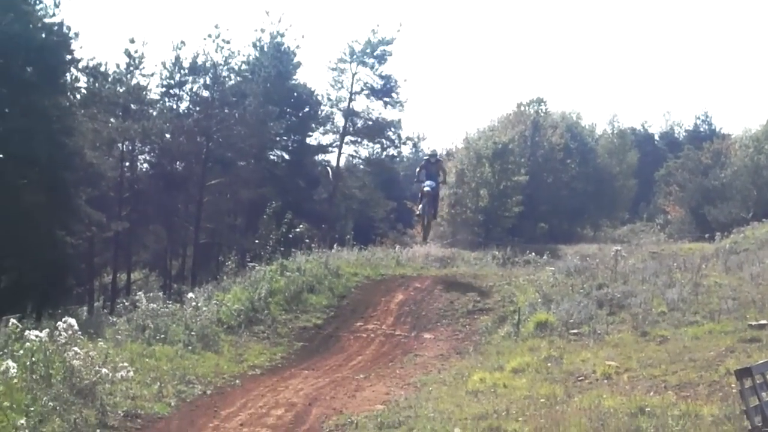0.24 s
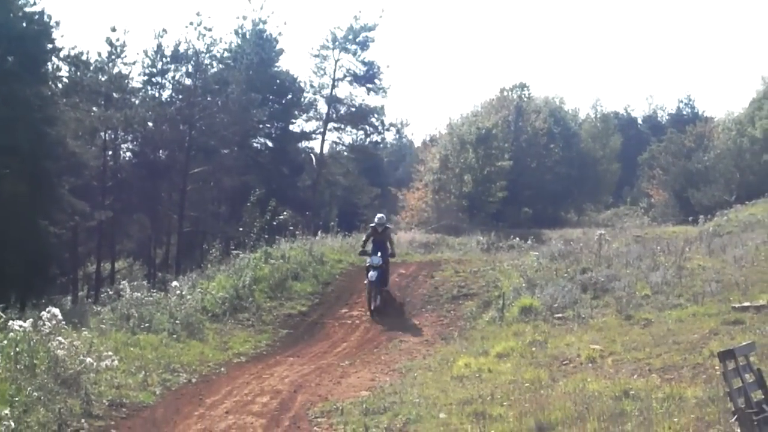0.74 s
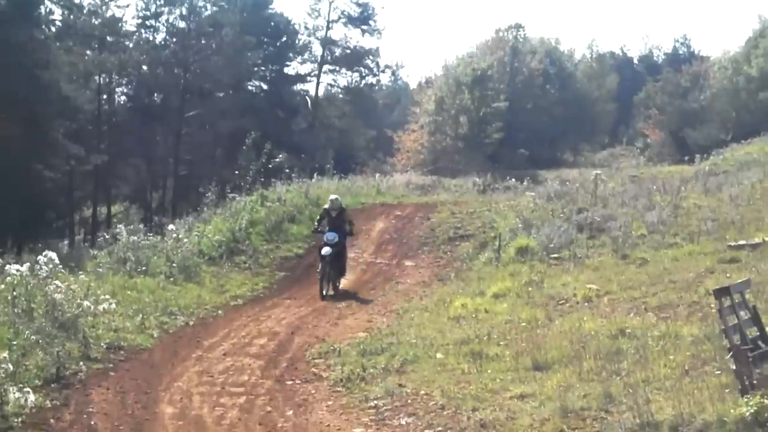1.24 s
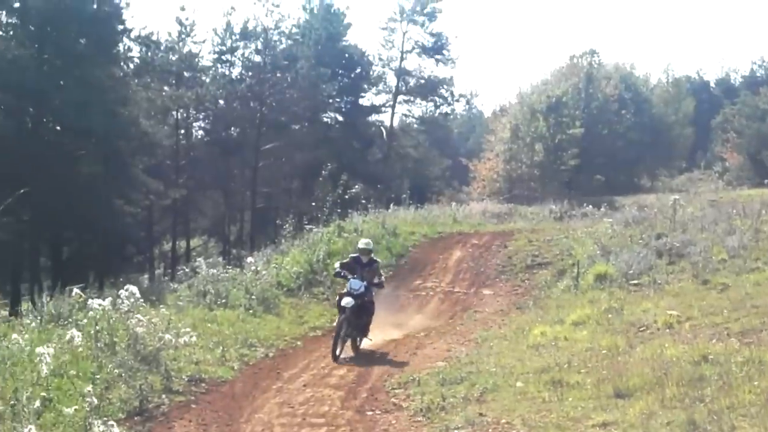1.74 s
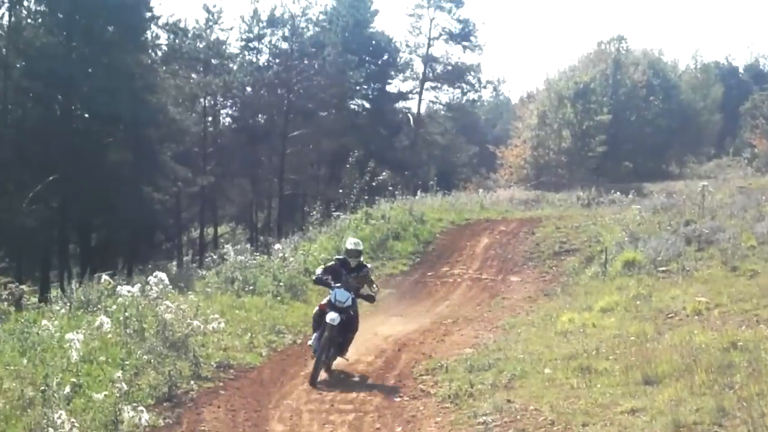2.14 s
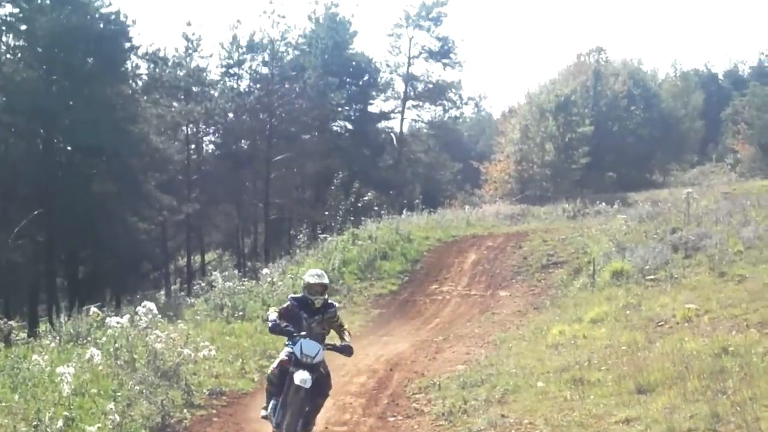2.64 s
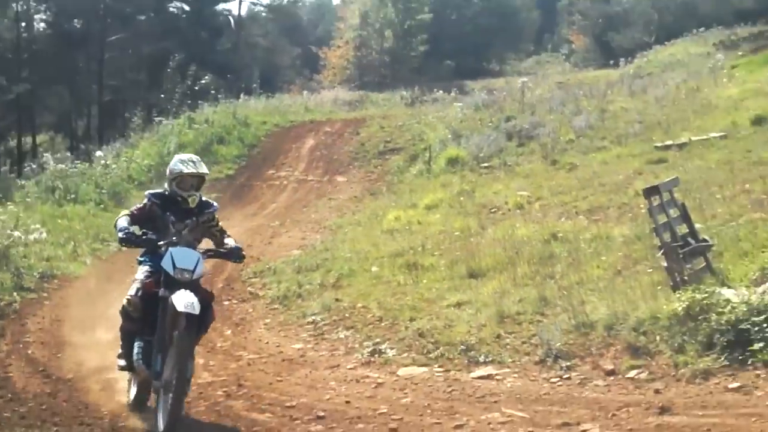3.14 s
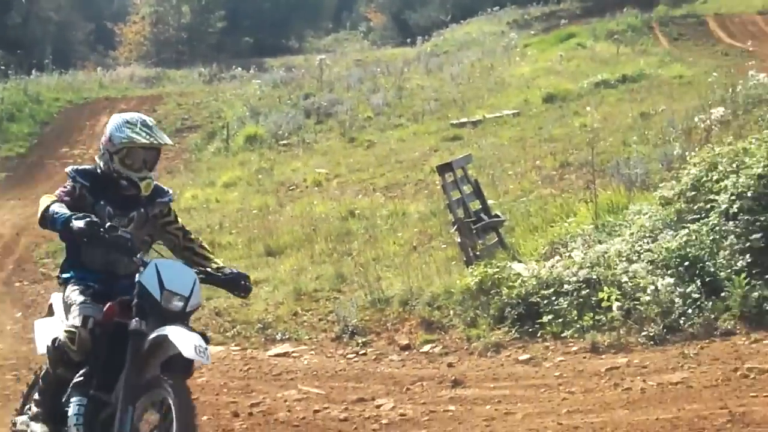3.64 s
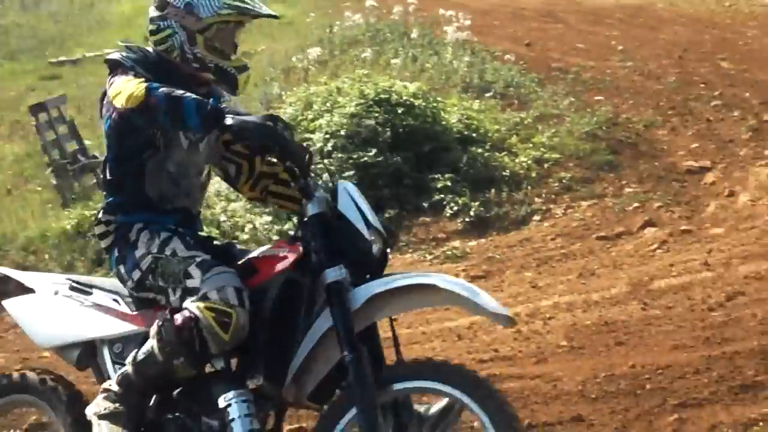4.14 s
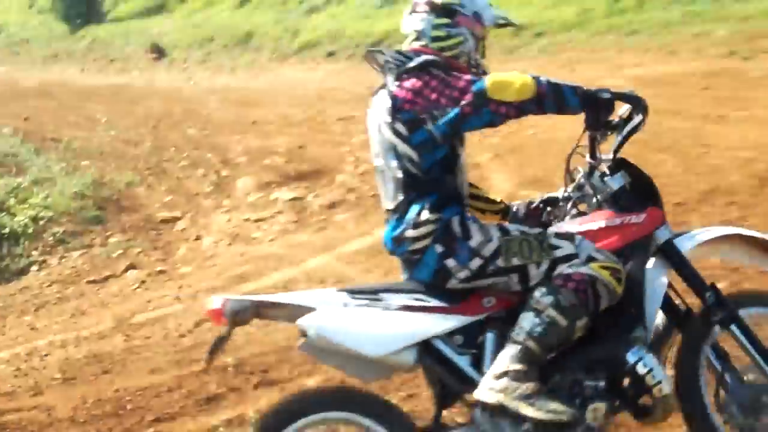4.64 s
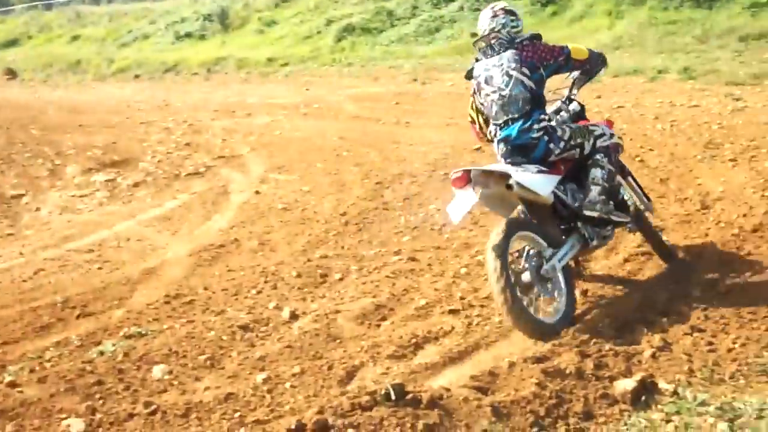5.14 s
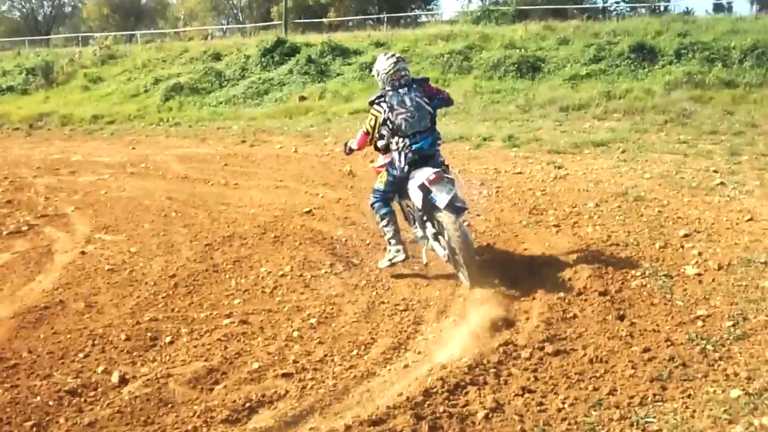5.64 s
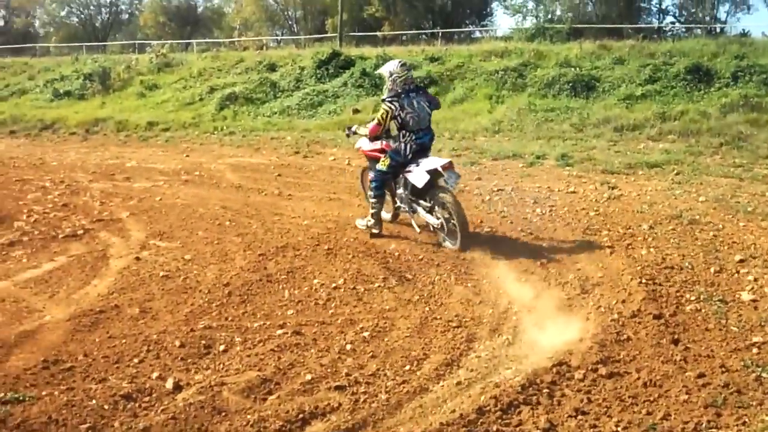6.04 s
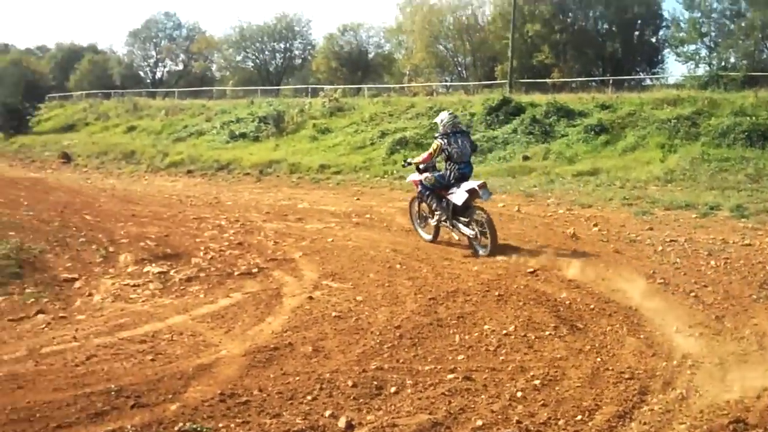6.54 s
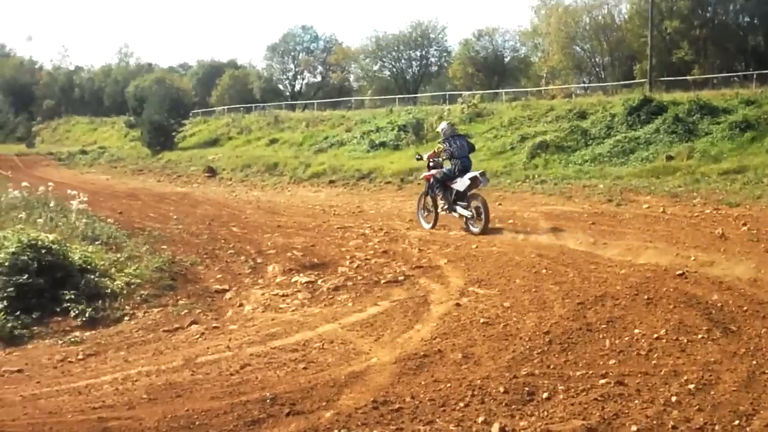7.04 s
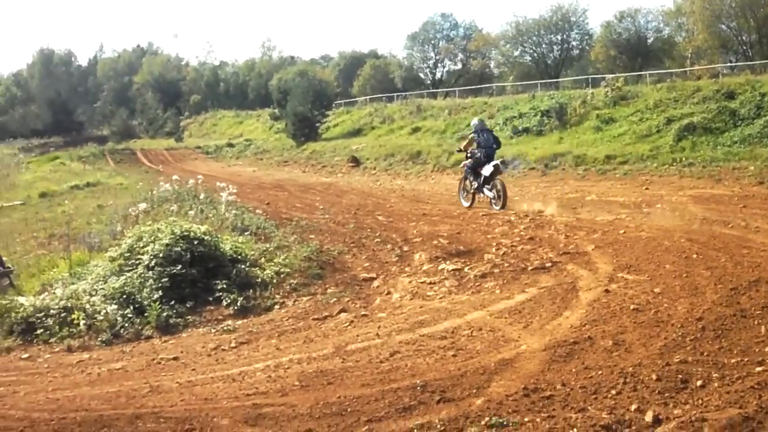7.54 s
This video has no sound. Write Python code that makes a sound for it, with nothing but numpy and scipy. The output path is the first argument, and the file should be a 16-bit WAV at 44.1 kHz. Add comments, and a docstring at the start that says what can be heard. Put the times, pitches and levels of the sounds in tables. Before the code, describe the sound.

On an open dirt track beside trees, a two-stroke dirt bike hums lightly in the air, lands with chain jingle and pops, and gives a sharp throttle burst. A second, slower engine thumps out of sight. The bike coasts nearer with gear whine and clatter, becoming rough and knocking alongside. Sound vanishes for over half a second, then crackles back as it accelerates away, barking, and shifts gear. Light wind rumbles on the handheld microphone.

```python
"""Dirt bike at the bend

In the open before a tree line, a two-stroke lands a jump, gives a burst of throttle, coasts up to about
4 m from the microphone and powers away out of a bend; firings and gas puffs ring its exhaust resonances.
A second, slower-thumping bike, strongest early on, runs out of sight as timed pulses, drone and ticks.
Filtered noise makes light wind on the microphone and distant air. The sound drops out for over half
a second as the bike passes and comes back with a crackle of short noise bursts."""
import sys
import numpy as np
from scipy import signal
from scipy.fft import rfft, irfft
from scipy.io import wavfile
from scipy.ndimage import uniform_filter1d

SR = 44100
rng = np.random.default_rng(int(sys.argv[2]) if len(sys.argv) > 2 else 0)


def store_pcm(level_fs):
    """Save levels as 16-bit WAV."""
    pcm = np.round(np.clip(level_fs, -1, 1) * 32767).astype(np.int16)
    wavfile.write(sys.argv[1], SR, np.atleast_2d(pcm).T)


N = 343978
TIME = np.arange(N) / SR
# each goes from 0 to 1: bike back on the ground, bike past the microphone, next gear in
LANDED = np.clip((TIME - .7) / .4, 0, 1)
PASSED = np.clip((TIME - 4.6) / .5, 0, 1)
SHIFTED = np.clip((TIME - 7.1) / .2, 0, 1)


def from_db(db):
    """Decibels to gain."""
    return 10 ** (np.asarray(db) / 20)


def in_time(rows):
    """Each column of a curve, at every sample."""
    s, *columns = np.transpose(rows)
    return [np.interp(TIME, s, c) for c in columns]


def steady(x, size=1800):
    """Hold the running power at one; single firings keep their shape."""
    power = uniform_filter1d(uniform_filter1d(x ** 2, size), size)
    return x / np.sqrt(np.abs(power) + 1e-14)


def below(x, hz, order=4):
    """The part of a sound under a frequency, without delay."""
    return signal.sosfiltfilt(signal.butter(order, hz, fs=SR, output="sos"), x)


def colour(x, spectrum):
    """Causal, minimum-phase filter with a (Hz, dB) curve; white noise keeps its power."""
    hz, db = np.transpose(spectrum)
    size = 2 ** 13
    bins = np.maximum(np.arange(size // 2 + 1) * SR / size, 1)
    gain = from_db(np.interp(np.log(bins), np.log(hz), db))
    # folding the cepstrum to positive times gives the minimum phase
    cepstrum = irfft(np.log(gain))
    response = irfft(np.exp(rfft(2 * cepstrum[:size // 2], size) - cepstrum[0]))
    return signal.oaconvolve(x, response / np.sqrt(np.sum(response ** 2)))[:N]


def resonate(x, modes):
    """Parallel two-stage resonances with steep skirts, from (Hz, width Hz, dB) rows."""
    out, x = 0, x + 1e-12 * rng.standard_normal(N)
    for hz, width, db in modes:
        r = np.exp(-np.pi * width / SR)
        stage = [(1 - r * r) / 2, 0, (r * r - 1) / 2, 1, -2 * r * np.cos(2 * np.pi * hz / SR), r * r]
        out = out + from_db(db) * signal.sosfilt([stage, stage], x)
    return out


def firings(turns, uneven_db):
    """One click per cycle, each of its own strength, placed between samples."""
    at = np.flatnonzero(np.diff(np.floor(turns)) > 0)
    late = (np.ceil(turns[at]) - turns[at]) / (turns[at + 1] - turns[at])
    strength = from_db((uneven_db * rng.standard_normal(N))[at])
    clicks = np.zeros(N)
    clicks[at], clicks[at + 1] = strength * (1 - late), strength * late
    return steady(clicks, size=4000)


def puffs(turns, length):
    """Turbulence that bursts at each firing and dies within a share of the cycle."""
    return steady(rng.standard_normal(N) * np.exp(-(turns % 1) / length))


def bursts(events, decay_s):
    """A short dying burst of noise for each (s, dB) row."""
    envelope = sum(from_db(db) * (TIME >= s) * np.exp(-np.abs(TIME - s) / decay_s) for s, db in events)
    return envelope * rng.standard_normal(N)


def per_turn(turns):
    """A random value for each turn, gliding from one to the next."""
    return np.interp(turns, np.arange(N), rng.standard_normal(N))


def radiate(x, table, pace=1):
    """Colour a sound as heard from ahead, then from behind; a pace under one lowers every resonance."""
    samples, clock = np.arange(N), np.cumsum(pace * np.ones(N)) - 1
    slowed = np.interp(samples, clock, x, right=0)
    ahead, behind = (np.interp(clock, samples, colour(slowed, np.array(table)[:, [0, side]]))
                     for side in (1, 2))
    return ahead + (behind - ahead) * PASSED


# faint air over the open ground: pitch_hz, relative_db (per Hz)
AIR_COLOUR = [(40, -22.5), (200, -4.5), (700, -11.5), (2000, -25.5), (4000, -27.5), (5500, -72),
              (8500, -45), (15500, -47.5)]


def distant_air():
    """Steady coloured noise stands for the distant air."""
    return from_db(-51.0) * colour(rng.standard_normal(N), AIR_COLOUR)


# gusts at the microphone: start_s, level_db
WIND_LEVEL = [(0, -49), (.9, -41), (1.7, -46), (3.3, -40), (5.3, -44), (5.9, -40), (6.2, -56), (7.8, -42)]
# their low rumble: pitch_hz, relative_db (per Hz)
WIND_COLOUR = [(15, -13), (30, -1), (55, -1), (110, -2), (200, -3), (400, -26.5), (1000, -54.5)]


def wind():
    """Wind pushes on the microphone as low noise that swells and falls."""
    level_db, = in_time(WIND_LEVEL)
    return from_db(level_db) * colour(rng.standard_normal(N), WIND_COLOUR)


def woods(x):
    """The tree line scatters back a faint, dull tail."""
    t = TIME[:SR]
    scatter = rng.standard_normal(SR) * from_db(-60 * t / .9) * (t > .025)   # falls 60 dB in 0.9 s
    scatter = scatter / np.sqrt(np.sum(scatter ** 2))
    scatter = signal.sosfilt(signal.butter(1, 2500, fs=SR, output="sos"), scatter)
    return from_db(-26) * signal.fftconvolve(x, scatter)[:N]


# the bike out of sight: start_s, rate_hz (firings per s)
OTHER_RATE = [(0, 42.6), (.2, 42.9), (.3, 43), (.37, 44.3), (.46, 43.4), (.55, 45.5), (.62, 49.5),
              (.68, 48.6), (.8, 52.5), (.95, 56.7), (1.0, 57), (1.05, 49), (1.09, 55.6), (1.16, 53),
              (1.22, 45.7), (1.45, 74), (1.62, 53), (1.84, 65), (1.93, 52.3), (2.0, 71.5), (2.08, 77),
              (2.17, 60), (2.26, 80), (2.52, 73.3), (3.2, 70.2), (5.9, 69), (6.8, 83)]
# how loud it comes over, before the shares of drone, thump and tick: start_s, level_db
OTHER_LEVEL = [(0, -46), (.56, -45.5), (.58, -41), (1.0, -36.5), (1.16, -34), (1.24, -48), (1.6, -43),
               (1.82, -33.5), (1.93, -36.5), (2.06, -31.5), (2.18, -42), (2.7, -44), (3.1, -50), (3.6, -54),
               (5.3, -41), (5.7, -42), (6.4, -50.5), (6.9, -44.5), (7.25, -56)]
# first order against its second in the drone: start_s, share (ratio)
OTHER_FIRST_ORDER = [(1.1, .45), (1.45, 1.2), (1.9, 0.81), (2.3, 0.079), (3.6, .08), (5.6, 1.8), (6.4, .9),
                     (6.8, 0.38)]
# its silencer: pitch_hz, relative_db
OTHER_SILENCER = [(25, -22.5), (43, 3), (86, 2), (130, -9.5), (175, 6), (215, 2.5), (257, 1.5),
                  (330, -10.5), (410, -5), (490, -18), (640, -11.5), (900, -44.5), (5000, -79)]
OTHER_PICKS_UP_S = .5795   # its first hard firing
DRONE_DB_PER_OCTAVE, THUMP_DB_PER_OCTAVE = 15, -12.5   # of revs above 55 firings per s
TICK_DB, IDLE_TICK_DB = -12, -7   # the second is added until it picks up


def other_bike():
    """A slow four-stroke thumps and ticks; at higher revs its thumps merge into a low drone."""
    rate, = in_time(OTHER_RATE)
    level_db, = in_time(OTHER_LEVEL)
    first_order, = in_time(OTHER_FIRST_ORDER)
    octaves = np.log2(rate / 55)
    turns = np.cumsum(rate) / SR
    turns = turns - np.interp(OTHER_PICKS_UP_S, TIME, turns)
    drone = steady(np.sin(4 * np.pi * turns) + first_order * np.sin(2 * np.pi * turns))
    pulses = firings(turns, uneven_db=.6) + .08 * puffs(turns, length=0.9)
    thump = steady(colour(pulses, OTHER_SILENCER))
    valves = puffs(turns, length=.12)
    tick = colour(valves, [(300, -8.0), (1000, 4.5), (2000, 7.0), (3200, 0.0),
                           (4200, -10.0), (5600, -10.5), (9000, -61.0)])
    drone = from_db(DRONE_DB_PER_OCTAVE * octaves) * drone
    thump = from_db(THUMP_DB_PER_OCTAVE * octaves) * thump
    tick = from_db(TICK_DB + IDLE_TICK_DB * (TIME < OTHER_PICKS_UP_S)) * tick
    return from_db(level_db) * (drone + thump + tick)


# a short low tone: start_s, pitch_hz, level_db
HUM = [(7.18, 300.4, -78), (7.24, 281, -54), (7.3, 252, -26), (7.39, 234.5, -26), (7.44, 236.6, -44),
       (7.5, 224.9, -85)]


def falling_hum():
    """A lone low tone, a gliding sine, sinks as the throttle reopens."""
    hz, db = in_time(HUM)
    return from_db(db) * np.sin(2 * np.pi * np.cumsum(hz) / SR)


# stones and chassis knocks: start_s, level_db (of the striking noise)
KNOCKS = [(2.936, -34), (3.8272, -28.5), (3.8897, -29)]
# what they ring: pitch_hz, width_hz, relative_db
KNOCK_MODES = [(1080, 560, 0), (2319, 874, -4.5), (3500, 720, -6), (5200, 1320, -11.5)]


def knocks():
    """Stones and chassis knocks: very short noise bursts ring a few broad resonances."""
    return from_db(12.5) * resonate(bursts(KNOCKS, decay_s=0.005), KNOCK_MODES)


# chain slaps after the landing and as the drive takes up: start_s, level_db (of the striking noise)
CHAIN_SLAPS = [(.99, -39), (1.005, -40.5), (1.058, -33), (1.079, -31.5), (1.096, -36), (1.125, -47),
               (1.245, -30)]
# its jingle: pitch_hz, width_hz, relative_db
CHAIN_RING = [(5650, 1600, -3.5)]


def chain():
    """Each slap of the slack chain sets off a short, bright jingle."""
    return resonate(bursts(CHAIN_SLAPS, decay_s=0.02), CHAIN_RING)


# pitch of the pipe as its gas heats and cools: start_s, pitch_share (of the hot pitch)
PIPE_TUNING = [(1.08, 0.81), (1.28, 0.89), (1.6, 1.03), (1.85, 1), (2.5, 0.89), (5.15, 1), (5.45, 0.94),
               (5.75, 1.003), (5.92, 0.98), (6.25, 1), (6.65, 1.014), (7.05, 0.95), (7.3, 0.87),
               (7.55, 0.87), (7.8, 0.92)]
# boom, bark and rasp with notches between, hot: pitch_hz, ahead_db, behind_db (both relative)
EXHAUST = [(59.19, -26, -9), (138, -1.5, -2), (186.8, 6, 5.5), (371, -1, -6), (420.9, -15.5, -17),
           (458, -5.5, -3.5), (542.7, -4, 13.5), (578, -2.5, 7.5), (760, 4, 18), (948.8, -26.5, -12),
           (1090.2, -4, 6.5), (1213.3, -17.5, -6), (1361.4, -45, -21), (1525, -40.5, -14),
           (1700, -39, -15.5), (1956, -35, -22.5), (2205, -49, -48), (3440, -56, -66)]


def exhaust(x):
    """The pipe rings lower while its gas is cool and rises as it heats under load."""
    pace, = in_time(PIPE_TUNING)
    return radiate(below(x, hz=4000, order=2), EXHAUST, pace)


# single hard firings as the engine catches: start_s, level_db (of the charge, before the pipe)
POPS = [(.992, -33), (1.008, -32), (1.062, -37), (1.083, -28.5), (1.093, -33), (1.25, -32), (1.278, -24),
        (7.322, -30), (7.336, -25.5), (7.369, -25), (7.382, -40), (7.403, -30)]
# the crack of gas: pitch_hz, width_hz, relative_db
POP_CRACK = [(1111.6, 250, -3), (1749, 850, 1)]


def pops():
    """Lone charges go off in the pipe as the engine catches; past the microphone each adds a crack of gas."""
    clicks = np.zeros(N)
    for s, db in POPS:
        clicks[round(s * SR)] = from_db(db)
    charge = clicks + .18 * bursts(POPS, decay_s=.004)
    pipe = exhaust(charge)
    crack = .5 * PASSED * resonate(charge, POP_CRACK)
    return from_db(20) * (pipe - .8 * below(pipe, hz=220, order=2) + crack)


# twists of the grip: start_s (opens), end_s (begins to shut), opening (0-1)
THROTTLE = [(1.05, 1.068, 0.47), (1.237, 1.28, 0.59), (1.267, 1.83, 0.71), (3.0, 3.508, 0.09),
            (4.181, 4.38, 0), (4.998, 5.45, 0.52), (5.37, 5.45, 0.63), (5.407, 5.5, 0.79),
            (5.44, 6.62, 0.84), (6.583, 7.051, 0.9), (7.3, 7.684, 0.8), (7.405, 7.483, 0.81),
            (7.55, 7.583, 0.7), (7.65, 7.802, 0.85)]
# missed firings as the engine picks up: middle_s, length_s
MISFIRES = [(7.353, 0.018), (7.4, 0.0042)]
OPEN_S, CLOSE_S = 0.024, 0.047   # time the engine takes to answer the grip


def throttle():
    """Load on the engine: each twist ramps up, holds and falls away; missed firings cut it."""
    twists = []
    for opens, shuts, opening in THROTTLE:
        ramp = np.minimum((TIME - opens) / OPEN_S, 1 - (TIME - shuts) / CLOSE_S)
        twists.append(opening * np.clip(ramp, 0, 1))
    missed = sum(np.exp(-(2 * (TIME - s) / length) ** 2) for s, length in MISFIRES)
    return np.max(twists, axis=0) * np.clip(1 - missed, 0, 1)


# rider to microphone: start_s, distance_m
DISTANCE = [(0, 24), (1.5, 12.9), (2.5, 11.2), (3.75, 7.5), (4.4, 4.06), (5.15, 6.43), (6.0, 7.53),
            (7.8, 11.56)]
# how squarely the silencer points at the microphone in the bend: start_s, aim (0-1)
AIM = [(5.15, 0), (5.5, 1), (5.95, 0.72), (6.25, 0.34), (7.8, 0.17)]
# loudness law of each part of the engine's voice, one row each, before that part's own mix:
# gain_db (10 m, 90 firings per s, throttle shut), throttle_db (added at full), revs_db (per octave),
# distance_db (per doubling), behind_db, aimed_db (in line with the silencer), next_gear_db
BOOM_LAW = (-35.5, 20, 3.5, -3.5, 1.5, -4, -2)
BARK_LAW = (-51, 29.5, -1, -7.5, -11, 12, 3)
HONK_LAW = (-71, 23.5, -36, -3, 0.5, -3.5, -5)
RASP_LAW = (-59, 23, -2.5, -1, 3, 2, 0)
METAL_LAW = (-44.5, 9.5, 6.5, -9.5, 4, -9, 0.5)
GEARS_LAW = (-51.5, 0, 0, -3.5, 0, 0, 0)


def loudness(law, opening, rate):
    """Gain of one part of the engine's voice from throttle, revs, distance and heading."""
    base_db, throttle_db, revs_db, distance_db, behind_db, aimed_db, shifted_db = law
    octaves = np.log2(rate / 90)
    doublings = np.log2(in_time(DISTANCE)[0] / 10)
    heading_db = PASSED * (behind_db + aimed_db * in_time(AIM)[0]) + SHIFTED * shifted_db
    running_db = throttle_db * opening + revs_db * octaves
    return from_db(base_db + running_db + distance_db * doublings + heading_db)


def meshing(turns, count=40):
    """Teeth meet alike on every turn: all orders of the revs, spread evenly over the turn."""
    share = np.linspace(0, 1, 2048)
    one_turn = sum(np.cos(2 * np.pi * (order * share + rng.random())) for order in range(1, count))
    return np.interp(turns % 1, share, one_turn)


# gears and intake singing on a shut throttle: pitch_hz, width_hz, relative_db
GEARBOX = [(424, 70, 12), (543, 50, 13.5), (787, 140, 7), (1282, 80, -0.5), (2067, 240, 3)]
BACKLASH_TURNS = .008


def gear_whine(turns, shut):
    """Meshing teeth, wandering within their backlash, ring the gearbox and intake as the bike nears."""
    play = BACKLASH_TURNS * per_turn(turns / 2)
    return shut * (1 - PASSED) * steady(resonate(meshing(turns + play), GEARBOX))


# clatter and hiss of the engine: pitch_hz, ahead_db, behind_db (both relative, per Hz)
CLATTER = [(293, -14, 2.5), (1154, 13, 6.5), (1507.1, -0.5, 5), (1870, 8, 6.5), (2250, -5, -4),
           (3139.4, -5, -5.5), (4030, -10, -18.5), (5230, -2.5, -6), (5890, -5.5, -9), (7360, -15, -20.5),
           (9000, -24, -26.5), (12000, -27, -28), (15583, -25, -27.5)]
# ringing of the engine cases: pitch_hz, width_hz, relative_db
CASES = [(2354, 300, 14), (3754, 57, 8), (5230, 140, -10.5)]


def engine_metal(clicks, turns):
    """Firings ring the cases alike on every turn, which puts lines into the hiss."""
    case_ring = rng.standard_normal(N)[:SR // 20] * np.exp(-TIME[:SR // 20] / 0.024)
    ringing_cases = steady(signal.fftconvolve(clicks, case_ring)[:N])
    hiss = 0.56 * ringing_cases + 1.344 * puffs(turns, length=6.0)
    # in the midrange the hiss gives way to the clean lines of meshing teeth
    rattle = hiss - .45 * below(hiss, hz=2300) + .25 * steady(meshing(turns, count=28))
    return 0.51 * radiate(rattle, CLATTER) + 0.22 * (1 - PASSED) * steady(resonate(rattle, CASES))


# rough knocking as the bike draws alongside: start_s, level_db
ALONGSIDE = [(3.4, -47.5), (4.1, -45.5), (4.24, -36.5), (4.4, -34), (4.55, -43)]
# its bark: pitch_hz, width_hz, relative_db
CYLINDER_BARK = [(765, 170, -0.5), (1240, 290, -10.5)]
# its bright fins: pitch_hz, width_hz, relative_db
CYLINDER_FINS = [(2160, 340, 0), (2700, 330, -2)]
FINS_DB, FINS_LATE_S = -8.5, 0.11   # the bright ring is heard a little later, side on


def cylinder(turns):
    """Close by and off the throttle, the engine fires raggedly into a rough bark and bright ringing fins."""
    bark_db, = in_time(ALONGSIDE)
    fins_db = FINS_DB + np.interp(TIME - FINS_LATE_S, TIME, bark_db)
    knocking = firings(turns, uneven_db=3) + 1.6 * puffs(turns, length=.9)
    bark = from_db(bark_db) * steady(resonate(knocking, CYLINDER_BARK))
    fins = from_db(fins_db) * steady(resonate(knocking, CYLINDER_FINS))
    return (1 - PASSED) * (bark + fins)


# the silencer's shell under load: pitch_hz, width_hz, relative_db
SHELL = [(2450, 130, 1), (3718, 180, -1), (5280, 120, 2)]


def silencer_shell(clicks, blowdown, shut):
    """From ahead, firings and gas are heard ringing the silencer's shell under load."""
    ring = steady(resonate(clicks + .5 * blowdown, SHELL))
    return from_db(-53.5) * (1 - PASSED) * (1 - shut) * ring


LOPE_DB, STUTTER = .8, .25   # scatter of the pulses; depth of strong-weak firing with the throttle shut


def lope(turns, shut):
    """No two gas pulses are equally strong, and at part throttle strong and weak ones alternate."""
    alternation = STUTTER * shut * np.cos(np.pi * turns)
    return from_db(LOPE_DB * per_turn(turns)) * (1 + alternation)


# narrow band gliding with the revs: start_s, multiple (of the firing rate), level_db (under full load)
SNARL = [(5.3, 28, -44), (5.52, 22, -39), (5.7, 16.3, -35), (5.8, 16.5, -35), (5.88, 21, -38.5),
         (6.1, 22, -37), (6.27, 21, -39.5), (6.42, 21.3, -39), (6.53, 20, -37.5), (6.66, 18, -39),
         (6.88, 16, -37), (7.04, 15, -36.5), (7.48, 19.5, -39), (7.6, 19.5, -44), (7.73, 15.5, -36),
         (7.8, 17.5, -38)]
SNARL_SHARE = .9   # of the cycle


def silencer_snarl(turns, shut):
    """From behind, each firing rings at a multiple of its rate, swelling and dying within the cycle."""
    multiple, level_db = in_time(SNARL)
    since = turns % 1
    swell = np.sin(np.pi * np.minimum(since / SNARL_SHARE, 1) ** .7) ** 2
    ring = steady(swell * np.sin(2 * np.pi * multiple * since))
    return from_db(level_db) * PASSED * (1 - shut) * lope(turns, shut) * ring


# one to four times the firing rate under load, a row each: ahead_db, behind_db, next_gear_db (relative)
BOOM_ORDERS = [(-29, -14, -22), (7, 7.5, 2), (-2, 1.5, -5), (-4, -6, -2.5)]


def low_orders(turns):
    """The gas pulse lasts a fixed share of the turn, so its first orders keep their balance within a gear."""
    total = 0
    for order, (ahead_db, behind_db, next_db) in enumerate(BOOM_ORDERS, 1):
        db = ahead_db + (behind_db - ahead_db) * PASSED + (next_db - behind_db) * SHIFTED
        total = total + from_db(db) * np.sin(2 * np.pi * order * turns)
    return steady(total)


def pumping(turns, shut):
    """Off the throttle, soft pumping at the first two orders is left; slow pumping radiates poorly."""
    strokes = 1.39 * np.sin(2 * np.pi * turns) + np.sin(4 * np.pi * turns)
    return from_db(-3.5) * shut * (strokes - below(strokes, hz=85.6))


# two-stroke firing rate through each stage of the ride: start_s, rate_hz (firings per s)
JUMP = [(0, 86), (.25, 88), (.35, 84), (.6, 77), (.86, 72), (1.02, 115), (1.1, 125), (1.2, 70)]
BURST = [(1.26, 103.9), (1.298, 107.9), (1.372, 98.9), (1.417, 106.1), (1.446, 103.6), (1.5, 109.2),
         (1.54, 103.4), (1.59, 109.7), (1.659, 108.6), (1.71, 111.6), (1.851, 109.8)]
COAST = [(2.04, 95.8), (2.19, 105.7), (2.44, 95.2), (2.519, 104.2), (2.701, 97.2), (2.77, 101.7),
         (2.93, 96), (2.991, 97.6), (3.099, 110), (3.2, 111.6), (3.44, 101), (3.58, 88.2), (3.7, 79.94),
         (3.87, 77.06), (3.97, 79.03), (4.16, 72.6), (4.419, 70.92), (4.549, 66.34)]
OUT_OF_BEND = [(5.15, 60.66), (5.214, 57.93), (5.278, 61.66), (5.347, 60.06), (5.451, 69.34),
               (5.644, 81.25), (5.692, 88.03), (5.81, 84.8), (5.88, 77.94), (5.95, 79.7), (6.021, 76.56),
               (6.09, 80.15), (6.138, 77.2), (6.218, 85.7), (6.256, 86.6), (6.342, 81.33), (6.402, 80.5),
               (6.44, 82.1), (6.498, 92.76), (6.562, 92.3), (6.638, 103.9), (6.708, 98), (6.771, 103.5),
               (6.838, 97.4), (6.928, 98.2), (7.08, 112.4)]
NEXT_GEAR = [(7.31, 85.2), (7.41, 88.83), (7.476, 93.74), (7.518, 84.5), (7.57, 92), (7.62, 85.1),
             (7.672, 100.4), (7.725, 112.6), (7.746, 110.2), (7.79, 99.9)]
# how the bark swells and sinks during the ride: start_s, level_db (relative)
BARK_SWELL = [(1.7, 1.5), (1.82, 3.5), (1.9, 0.5), (5.4, -1), (5.65, 1), (5.71, -3.5), (5.78, 0),
              (5.9, 3.5), (6.2, 0), (6.56, -1), (6.63, 5), (6.72, 1), (6.9, -1.5), (7.05, -2), (7.47, 2),
              (7.63, -1), (7.75, 2)]
# how the rasp swells and sinks during the ride: start_s, level_db (relative)
RASP_SWELL = [(1.5, 2.5), (1.82, 7), (1.9, -3), (5.16, 5), (5.38, 2), (5.56, -1), (5.71, -5.5), (5.8, -1),
              (6.2, -6.5), (6.38, 0.5), (6.5, -3), (6.65, -4.5), (6.86, -1.5), (7.04, -2), (7.38, -1),
              (7.46, -18), (7.64, -8), (7.73, 4.5), (7.8, -8)]
# the pipe's honk when the engine lugs at low revs: pitch_hz, width_hz, relative_db
HONK_MODE = [(433, 147, 0)]
LEAN_AT, CLEAN_AT = .3, .95   # firing is ragged below the first opening and even above the second
GAS_OPEN, GAS_SHUT = .12, .5   # share of turbulent gas at full throttle, and added as it shuts
AIRBORNE_DB = -10.5   # the unloaded engine booms less in the air
CHATTER_DB = 3.5


def two_stroke():
    """Firings and gas puffs ring the exhaust; piston, gears and jet noise ride on top."""
    rate, = in_time(JUMP + BURST + COAST + OUT_OF_BEND + NEXT_GEAR)
    opening = throttle()
    turns = np.cumsum(rate) / SR
    shut = 1 - np.clip((opening - LEAN_AT) / (CLEAN_AT - LEAN_AT), 0, 1)
    clicks = firings(turns, uneven_db=0.43 + 1.0 * shut)
    # a soft wave returns from the pipe half a turn later: it weakens the first order and lifts the second
    returned = 0.69 * below(firings(turns + .5, uneven_db=.6), hz=145, order=2)
    blowdown = puffs(turns, length=.55 + .5 * shut)
    gas = colour(blowdown, [(150, -2.0), (700, 0.5), (1600, -7.5)])
    drive = clicks + returned + (GAS_OPEN + GAS_SHUT * shut ** 2) * gas
    pipe = exhaust(drive)
    pipe = pipe - below(pipe, hz=62, order=2)   # steady outflow makes no sound
    silencer = radiate(drive, EXHAUST)   # its high resonances keep their pitch

    # load shifts the weight between the pipe's low, middle and high resonances
    low, low_and_middle = below(pipe, hz=410), below(pipe, hz=884)
    boom_gain = loudness(BOOM_LAW, opening, rate) * from_db(AIRBORNE_DB * (1 - LANDED))
    loaded = (1 - shut) * from_db(-1.5) * lope(turns, shut) * low_orders(turns)
    boom = boom_gain * (loaded + from_db(-11.5 + 3.0 * shut) * steady(low) + pumping(turns, shut))
    bark_gain = loudness(BARK_LAW, opening, rate) * from_db(in_time(BARK_SWELL)[0])
    bark = bark_gain * steady(low_and_middle - low)
    honk = loudness(HONK_LAW, opening, rate) * PASSED * steady(resonate(drive, HONK_MODE))
    rasp_gain = loudness(RASP_LAW, opening, rate) * from_db(in_time(RASP_SWELL)[0])
    rasp = rasp_gain * steady(silencer - below(silencer, hz=962))
    outlet = silencer_snarl(turns, shut) + silencer_shell(clicks, blowdown, shut)

    # unloaded gears chatter in their backlash, unevenly from turn to turn
    chatter = from_db(shut * (1 - PASSED) * CHATTER_DB * per_turn(turns / 2))
    metal = loudness(METAL_LAW, opening, rate) * np.sqrt(chatter) * engine_metal(clicks, turns)
    whine = loudness(GEARS_LAW, opening, rate) * chatter * gear_whine(turns, shut)
    return boom + bark + honk + rasp + outlet + cylinder(turns) + metal + whine


def scene():
    """Both bikes in the open, with wind and distant air."""
    bikes = other_bike() + falling_hum() + chain() + pops() + two_stroke()
    return (distant_air() + wind() + woods(bikes) + knocks() + bikes)[None]


# the silence as the bike passes: start_s, end_s
DROPOUT_S = (4.556, 5.1345)
# crackle as the sound returns: start_s, level_db (before its filter)
CRACKLE = [(5.1348, -25), (5.1364, -24), (5.1393, -20.5), (5.1421, -13.5), (5.1452, -38)]
CUTOFF_HZ = 15800


def record(dry):
    """The signal drops out and crackles back over a very faint hiss; the top is cut."""
    live = (TIME < DROPOUT_S[0]) | (TIME > DROPOUT_S[1])
    crackle = from_db(1.0) * signal.lfilter([.6], [1, -.55], bursts(CRACKLE, decay_s=0.00091))
    hiss = from_db(-105) * rng.standard_normal(N)
    top_cut = signal.ellip(10, .2, 90, CUTOFF_HZ, fs=SR, output="sos")
    return signal.sosfilt(top_cut, dry * live + crackle + hiss)


dry = scene()
out = record(dry)
store_pcm(out)
```